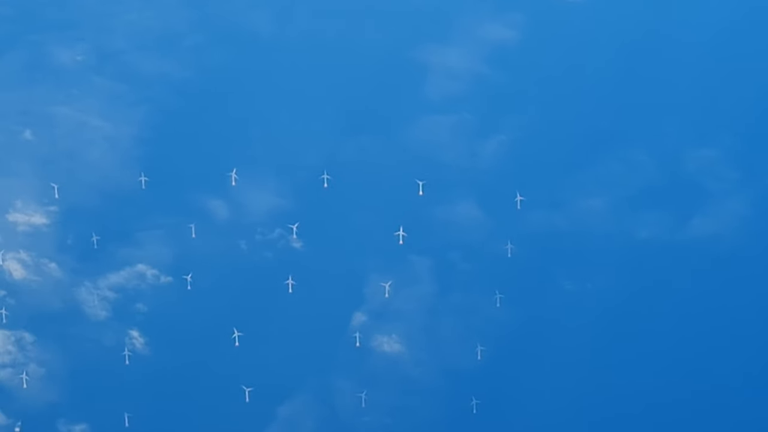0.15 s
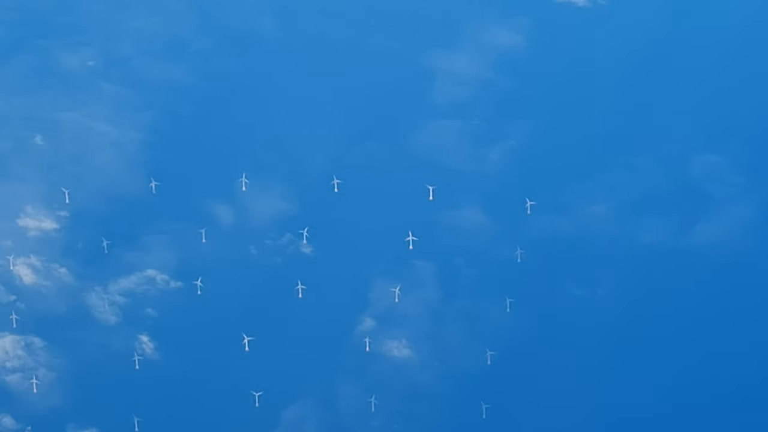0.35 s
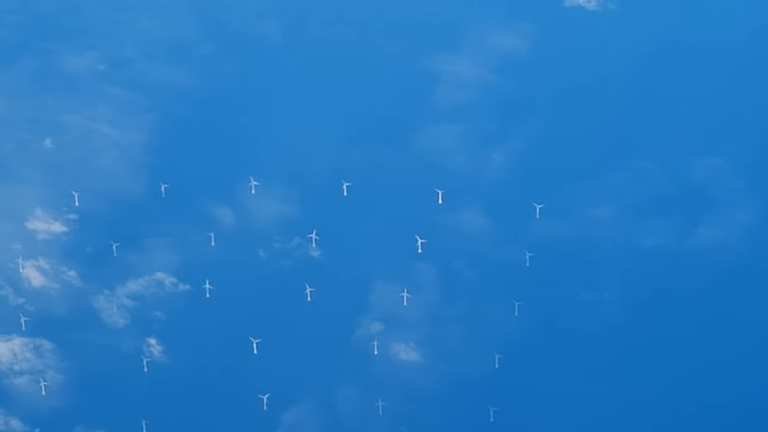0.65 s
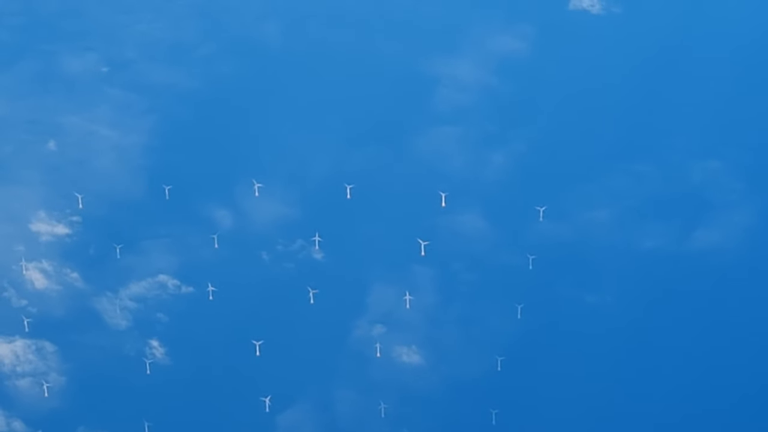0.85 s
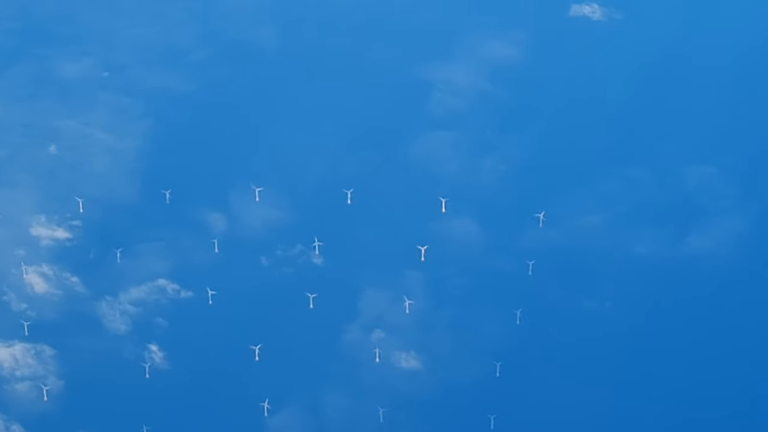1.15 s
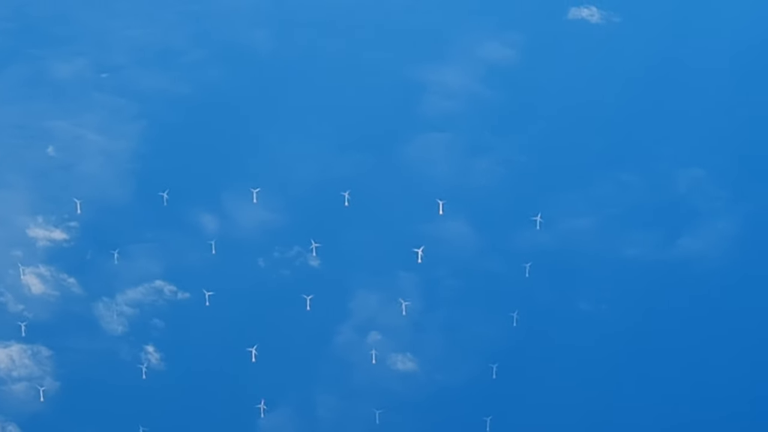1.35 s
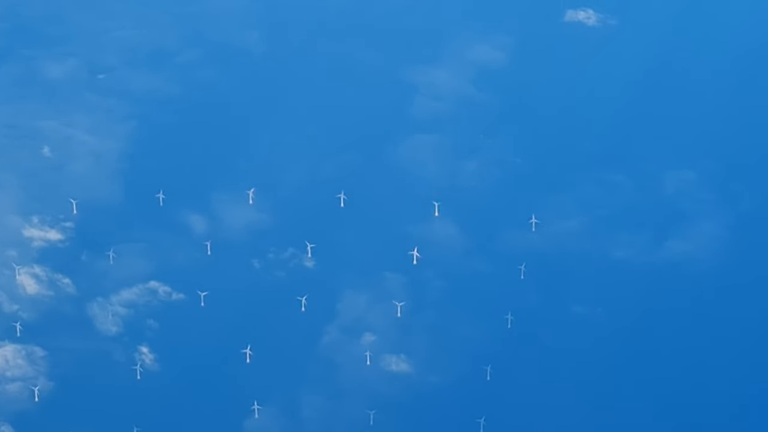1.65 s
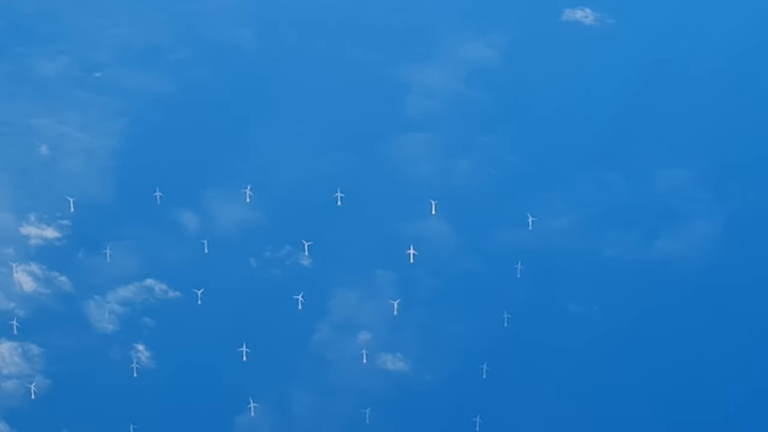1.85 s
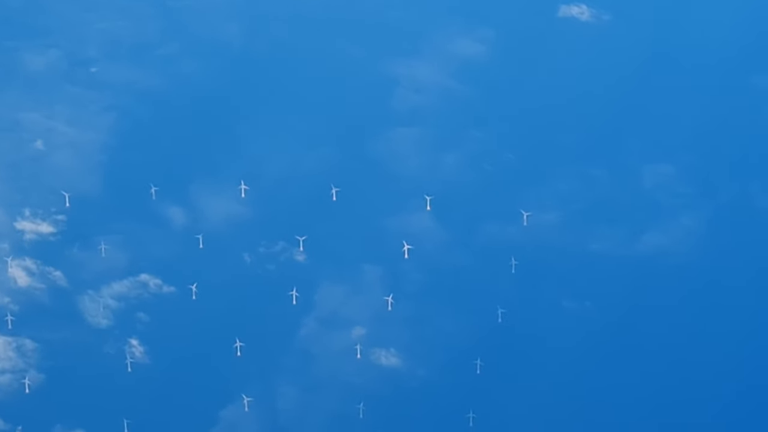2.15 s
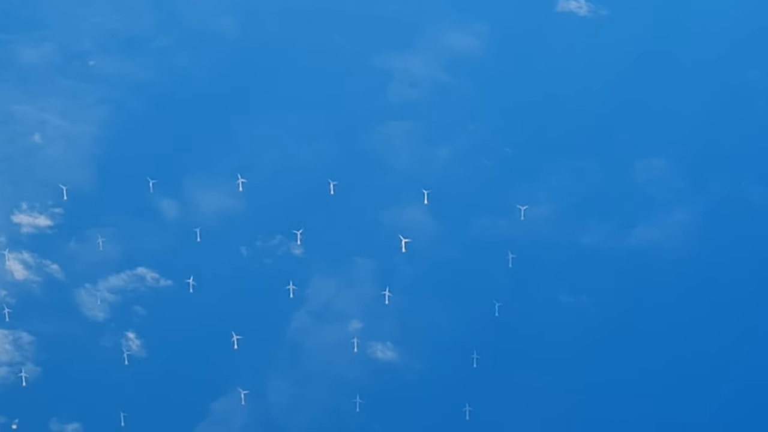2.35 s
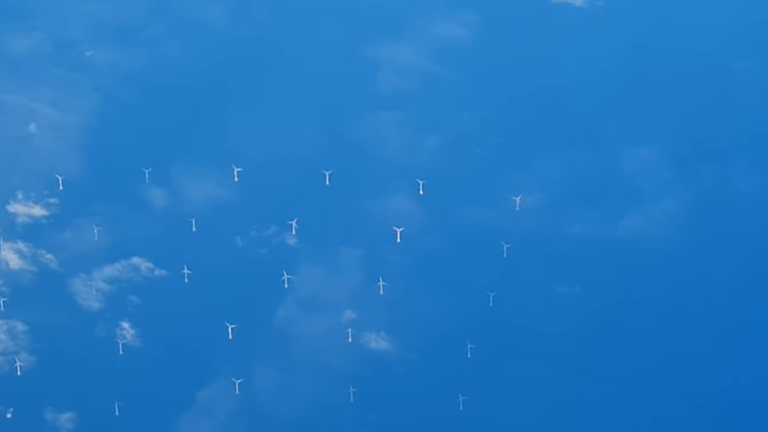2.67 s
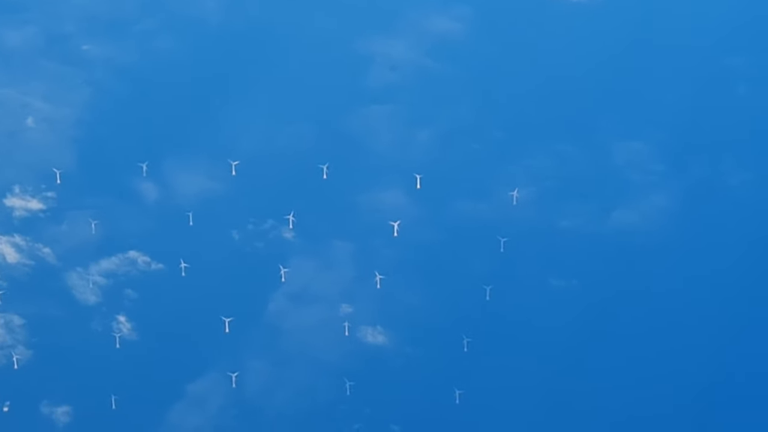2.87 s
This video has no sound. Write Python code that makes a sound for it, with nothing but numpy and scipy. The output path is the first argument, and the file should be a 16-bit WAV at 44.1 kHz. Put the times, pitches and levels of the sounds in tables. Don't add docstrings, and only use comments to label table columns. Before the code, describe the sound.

Low jet engine drone and airflow roar heard inside a cruising aircraft, with tiny trim clicks

```python
import sys
import numpy as np
from scipy import signal
from scipy.fft import rfft, irfft
from scipy.io import wavfile
from scipy.ndimage import uniform_filter1d

SR = 44100
rng = np.random.default_rng(int(sys.argv[2]) if len(sys.argv) > 2 else 0)


def amplitude_ratio(level_db):
    exponent = np.asarray(level_db, float) / 20
    return 10 ** exponent


def int16_out(signal):
    q = np.round(np.clip(np.atleast_2d(signal).T, -1, 1) * 32767)
    wavfile.write(sys.argv[1], SR, q.astype(np.int16))


N = 132741
FREQ = np.maximum(np.fft.rfftfreq(N, 1 / SR), 1)


def read(table, col=1):
    table = np.array(table, float)
    return np.interp(np.log(FREQ), np.log(table[:, 0]), table[:, col])


def level(x, db):
    return x * amplitude_ratio(db) / np.sqrt(np.mean(x ** 2))


def ring(hz, width_hz):
    detuning = (FREQ / hz - hz / FREQ) * hz / width_hz
    return (1 + 1j * detuning * 0.79) ** -2


def walk(rate):
    hold = int(SR / rate)
    steps = np.repeat(rng.standard_normal(N // hold + 1), hold)
    return 1.425 * uniform_filter1d(uniform_filter1d(steps, hold), hold)[:N]


def bell(t, centre, span):
    return np.exp(-(2 * (t - centre) / span) ** 4)


def ports():
    spread_turns = 0.15
    return 2 * np.pi * spread_turns * rng.random((2, 1))


def rung(parts):
    power = sum(np.abs(amplitude_ratio(db) * ring(hz, width)) ** 2 for hz, width, db in parts)
    noise = rfft(rng.standard_normal((2, N)))
    return level(irfft(noise * np.sqrt(power), N), 0)


# (frequency [Hz], likeness [0-1], phase lead of the left [rad])
PORT_COHERENCE = [(25, 0.99, 0.3), (60, 0.97, 0.4), (163, 0.98, -0.16), (302, 0.83, 0.61), (360, 0.96, 0.1),
                  (492, 0.95, 0.97), (670, 0.04, -0.5), (1324, 0.44, 4.5), (2585, 0.45, -10.5)]
# (frequency [Hz], left minus right [dB])
PORT_BALANCE = [(60, -1.5), (110, 0.0), (200, 0.5), (380, -1), (700, -1), (1290, -4.5), (2380, 0.5),
                (4400, 0), (8120, 1.5), (15000, -0.5)]


def diffuse(gain):
    a, b = rfft(rng.standard_normal((2, N)))
    unrelated_above_hz = 2600
    like = np.clip(read(PORT_COHERENCE), 0, 1) * (FREQ < unrelated_above_hz)
    delayed = np.exp(-1j * read(PORT_COHERENCE, col=2)) * a
    right = like * delayed + np.sqrt(1 - like ** 2) * b
    lean = amplitude_ratio(read(PORT_BALANCE) / 2)
    return irfft(np.array([a * lean, right / lean]) * gain, N)


def closed(table):
    low_hz, low_db = table[0]
    high_hz, high_db = table[-1]
    below = [(low_hz / 2, low_db - 30)]
    above = [(high_hz * 2, high_db - 35), (high_hz * 10, high_db - 120)]
    return amplitude_ratio(read(below + table + above))


# (frequency [Hz], spectral density [dB per Hz])
EXHAUST = [(27, -30), (36, -13), (46, -10), (70, -5.5), (92, -11), (190, -7.5), (340, -2.5), (500, -13.5)]
# (frequency [Hz], spectral density [dB per Hz])
BOUNDARY_LAYER = [(420, -8), (620, 0.5), (1000, -2), (1500, -12.5), (2000, -21), (2500, -24), (4000, -32),
                  (5000, -37.5)]
# (frequency [Hz], spectral density [dB per Hz])
AIR_SUPPLY = [(3500, 3.5), (5600, 1.5), (6300, -3), (9000, -2), (11800, -2), (13000, -5.5), (14500, -7.5),
              (16000, -11)]


def broadband():
    out = 0
    for spectrum, db in [(EXHAUST, -20.5), (BOUNDARY_LAYER, -25.5), (AIR_SUPPLY, -53.5)]:
        flicker_db = 0.5 * walk(8.95)
        out = out + level(diffuse(closed(spectrum)), db) * amplitude_ratio(flicker_db)
    return out


# (frequency [Hz], bandwidth [Hz], level [dB])
PANEL_MODES = [(118.6, 19, -32.5), (232.5, 56, -30), (325.7, 40, -36.5), (350.2, 23, -42.5),
               (552.6, 39, -33), (694, 58, -39), (925, 88, -41), (1244, 77, -45), (1814, 71, -47.5),
               (2136, 83, -56), (2400, 90, -63.5), (2590, 59, -68), (3056, 58, -57.5), (3690, 170, -66)]


def panels():
    out = 0
    for hz, width, db in PANEL_MODES:
        sway_db = 2 * walk(3.9)
        out = out + level(diffuse(ring(hz, width)), db) * amplitude_ratio(sway_db)
    return out


# (time [s], level [dB])
BOOM_LEVEL = [(0.0, -30.5), (0.28, -22.5), (0.3, -16), (0.43, -30.5), (0.51, -16.5), (0.57, -26),
              (0.6, -20), (0.93, -32), (0.95, -20.5), (1.25, -27), (1.27, -20), (2.12, -29), (2.17, -25),
              (2.27, -31), (2.32, -17), (2.38, -38), (2.51, -25.5), (3.01, -27)]


def boom(t):
    hz, width_hz, steadiness = 159.1, 17.6, 0.52
    pair = diffuse(ring(hz, width_hz))
    envelope = uniform_filter1d(np.abs(signal.hilbert(pair.mean(axis=0))), size=400)
    pair = pair / (envelope + 0.15 * envelope.mean()) ** steadiness
    return level(pair, 0) * amplitude_ratio(np.interp(t, *np.array(BOOM_LEVEL).T))


def vent():
    hz, width_hz, db, lag_s = 2910, 480, -52.5, 0.000662
    air = rfft(rng.standard_normal(N)) * ring(hz, width_hz)
    delay = np.exp(-2j * np.pi * FREQ * np.array([[0], [lag_s]]))
    return level(irfft(air * delay, N), db) * amplitude_ratio(0.14 * walk(5.3))


# (frequency [Hz], level [dB])
BLADE_TONES = [(1827, -62), (2159, -61), (4319, -77), (4580, -77), (8640, -83)]


def turbines(t):
    out = 0
    for hz, db in BLADE_TONES:
        waver_hz = 3 * walk(5)
        turns = np.cumsum(hz + waver_hz) / SR + rng.random((2, 1))
        out = out + np.sqrt(2) * amplitude_ratio(db + 2.0 * walk(4.3)) * np.sin(2 * np.pi * turns)
    return out


def hum():
    hz, db, waver_hz, lead_turns = 33, -41.5, 0.6, 0.05
    turns = np.cumsum(hz + waver_hz * walk(3)) / SR + np.array([[lead_turns], [0]])
    return np.sqrt(2) * amplitude_ratio(db + 1.7 * walk(2.8)) * np.sin(2 * np.pi * turns)


# (time [s], peak level [dB], left minus right [dB], decay time T60 [s], dull body over bright edge [dB])
TRIM_TICKS = [
    (.3086, -41.5, 5, 0.045, -12),
    (1.7924, -51, 2.5, .12, 7),
    (1.7994, -51, 0., .1, -1),
    (1.8155, -49, 3, 0.14, 9.5),
    (1.8368, -46, 4, 0.074, 7.5),
    (1.8494, -54, 6, 0.069, 6),
    (2.9716, -53, 6, .1, -5),
]
# (frequency [Hz], bandwidth [Hz], level [dB])
BODY_MODES = [(2970, 740, 8), (4140, 1600, 0), (5300, 1500, -1.5), (6400, 920, -10)]
# (frequency [Hz], bandwidth [Hz], level [dB])
EDGE_MODES = [(7900, 2200, -0.5), (9700, 2200, -11), (11700, 2400, 0.5), (14000, 3600, -6)]
TICK_RISE_S = 0.001


def ticks(t):
    hold_s, crack_db, crack_s, body_late_s = 0.005, 2, 0.002, 0.001
    edge_power, body_power = np.zeros((2, 2, N))
    for start, db, pan_db, t60, body_db in TRIM_TICKS:
        age = np.maximum(t - start, 0)
        rise = np.minimum(age / TICK_RISE_S, 1)
        fall = amplitude_ratio(-60 * np.maximum(age - hold_s, 0) / t60)
        pan = np.array([[pan_db], [-pan_db]]) / 2
        shape = rise * fall * amplitude_ratio(db - 2 + pan)
        crack = amplitude_ratio(crack_db * np.exp(-age / crack_s))
        edge_power = edge_power + (shape * crack) ** 2
        late = np.roll(shape * amplitude_ratio(body_db), int(body_late_s * SR), axis=1)
        body_power = body_power + late ** 2
    return np.sqrt(edge_power) * rung(EDGE_MODES) + np.sqrt(body_power) * rung(BODY_MODES)


# (frequency [Hz], decay time T60 [s], level [dB])
LATCH_MODES = [(3470, .065, -38), (3620, .03, -45), (5300, .045, -43.5), (6200, .03, -53), (8000, .05, -50),
               (10700, .02, -40), (11500, .03, -38.5)]


def latch(t):
    age = np.maximum(t - TRIM_TICKS[0][0], 0)
    rise = 1 - np.exp(-2 * age / TICK_RISE_S)
    out = 0
    for hz, t60, db in LATCH_MODES:
        out = out + amplitude_ratio(db - 60 * age / t60) * rise * np.sin(2 * np.pi * hz * age + ports())
    return out


# (time [s], peak level [dB], left minus right [dB])
PLASTIC_SNAPS = [(.3089, -34, 1), (.3096, -33, 2), (.3108, -37, 9), (.3129, -32, -1), (.3153, -37, 5),
                 (1.7938, -45, 4), (1.7995, -41, -2), (1.8162, -42, 3), (1.8180, -42, 5), (1.8222, -39, -2),
                 (1.8265, -40, 5), (1.837, -33, 4), (1.8384, -38, 0), (1.8420, -37, 2), (1.8460, -38, 5),
                 (1.8515, -41, 3), (1.8560, -42, 3)]


def snaps():
    colour = 0
    for k, (hz, width, db) in enumerate(EDGE_MODES + BODY_MODES[1:]):
        colour = colour + (-1) ** k * amplitude_ratio(db) * ring(hz, width)
    kicks = np.zeros((2, N))
    for start, db, pan_db in PLASTIC_SNAPS:
        pan = np.array([pan_db, -pan_db]) / 2
        kicks[:, int(start * SR)] = amplitude_ratio(db + pan) * rng.choice([-1, 1], size=2)
    peak = np.abs(irfft(colour, N)).max()
    return irfft(rfft(kicks) * colour, N) / peak


# (time [s], duration [s], frequency [Hz], bandwidth [Hz], level [dB])
CLOTH_BRUSHES = [(.80, .01, 11000, 9000, -64), (.92, 0.11, 9700, 2400, -59), (1.35, .06, 9000, 6000, -61),
                 (1.66, .08, 11000, 4930, -62), (1.825, .07, 6000, 6000, -54),
                 (2.49, .04, 10500, 4000, -65), (2.62, 0.049, 4250, 500, -53),
                 (2.73, 0.14, 9000, 4000, -63), (2.976, .014, 9600, 600, -56),
                 (1.843, 0.041, 4800, 2000, -48.5), (1.785, .03, 9000, 9000, -57),
                 (1.83, .04, 8000, 7000, -60), (1.848, 0.0072, 2880, 500, -44)]


def brushes(t):
    out = 0
    for centre, span, hz, width, db in CLOTH_BRUSHES:
        noise = rfft(rng.standard_normal((2, N)))
        hiss = irfft(noise * ring(hz, width), N)
        out = out + level(hiss, db) * bell(t, centre, span)
    return out


# (time [s], duration [s], frequency [Hz], level [dB])
SEAT_SQUEAK = (2.21, .09, 1838, -46.5)


def squeak(t):
    centre, span, hz, db = SEAT_SQUEAK
    phase = 2 * np.pi * np.cumsum(hz * (1 + 0.0042 * walk(31.0))) / SR
    return np.sqrt(2) * amplitude_ratio(db) * bell(t, centre, span) * np.sin(phase + ports())


def scene():
    t = np.arange(N) / SR
    steady = broadband() + panels() + boom(t) + vent() + turbines(t) + hum()
    brief = ticks(t) + latch(t) + snaps() + brushes(t) + squeak(t)
    return steady + brief


def roll_off(x):
    return signal.sosfilt(signal.butter(12, 15785, fs=SR, output="sos"), x)


def record(dry):
    return roll_off(dry)


dry = scene()
out = record(dry)
int16_out(out)
```